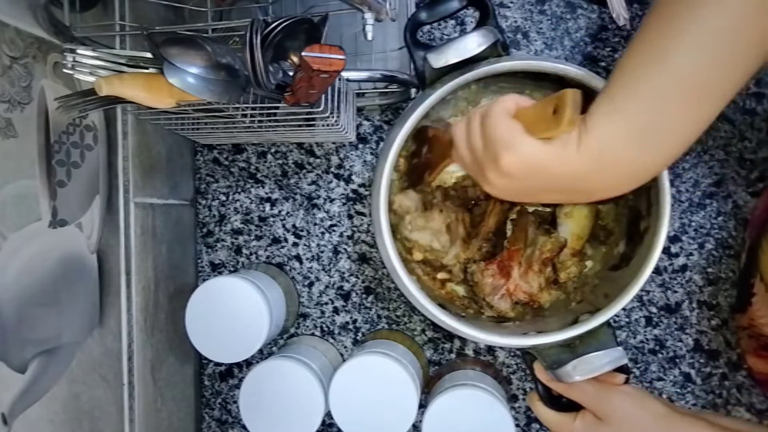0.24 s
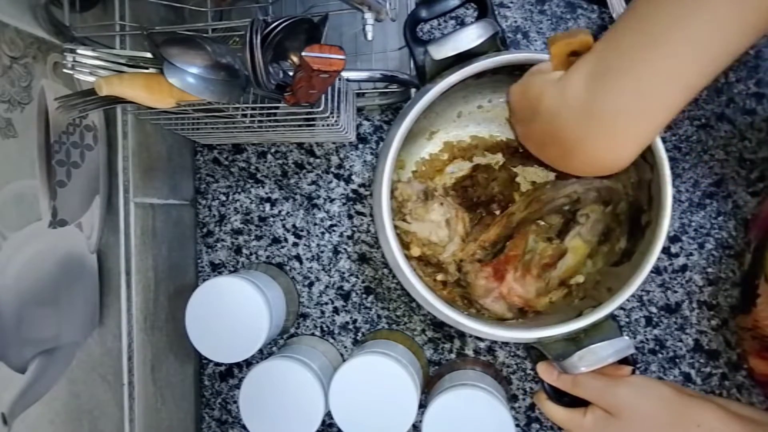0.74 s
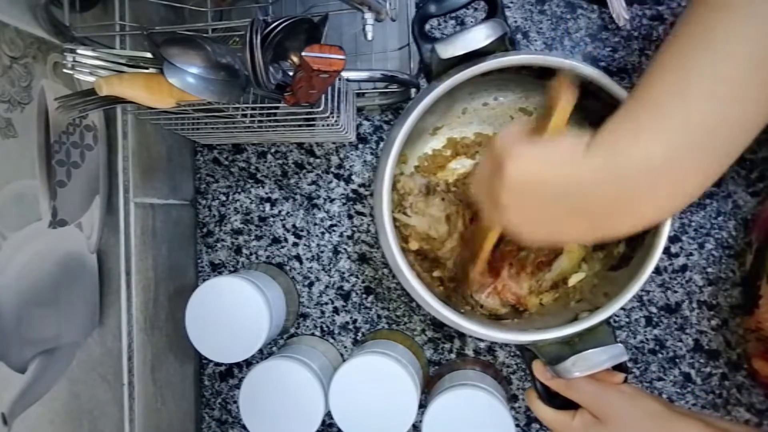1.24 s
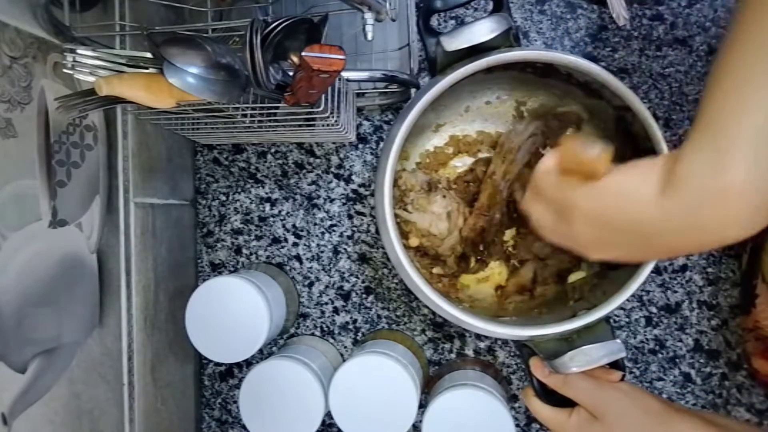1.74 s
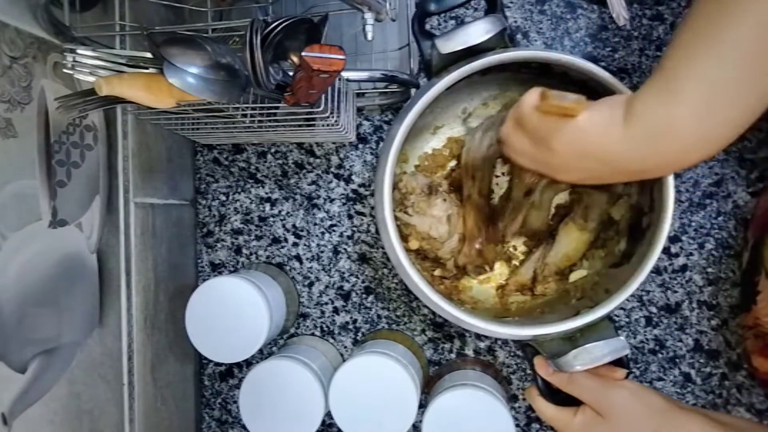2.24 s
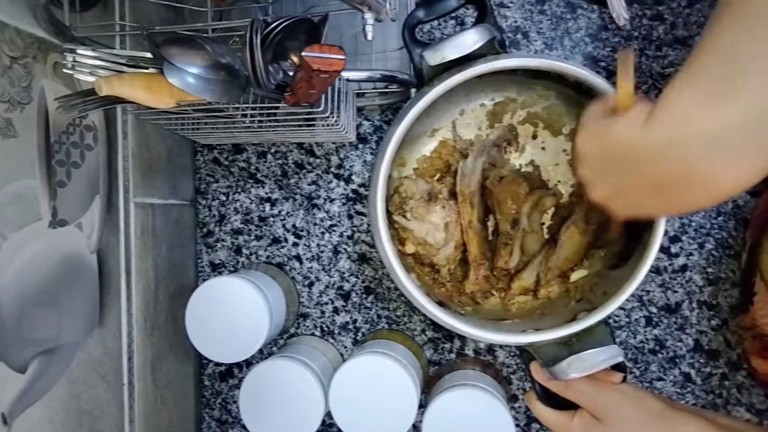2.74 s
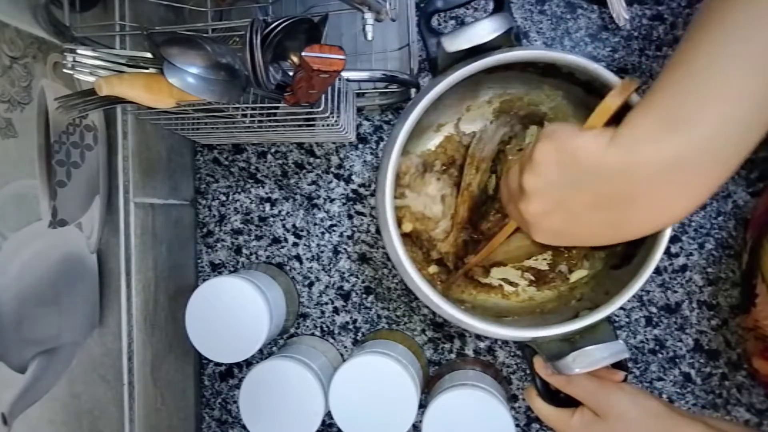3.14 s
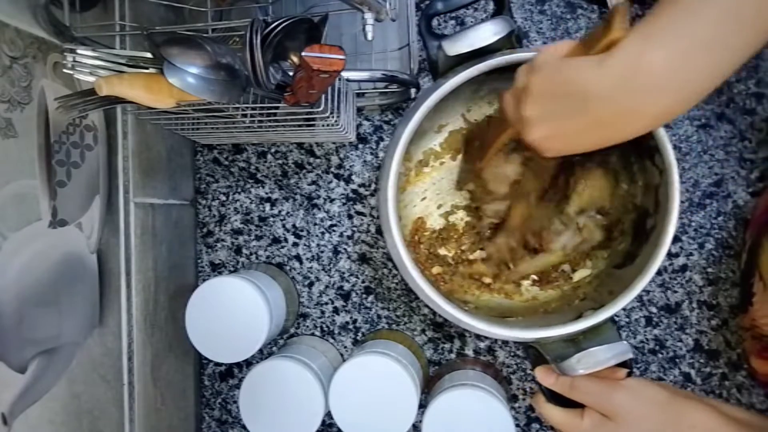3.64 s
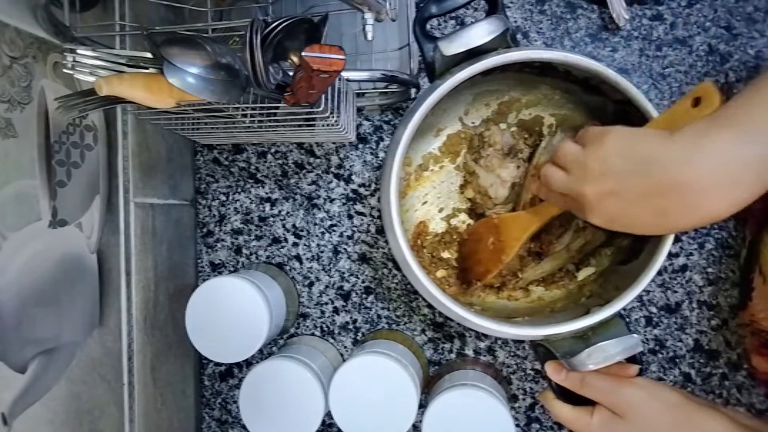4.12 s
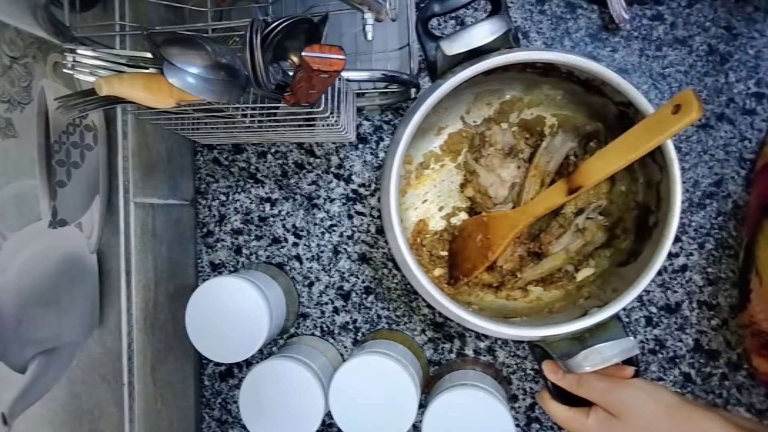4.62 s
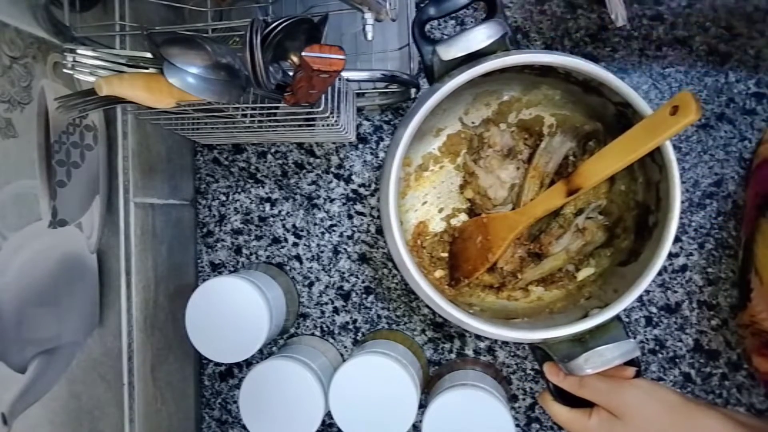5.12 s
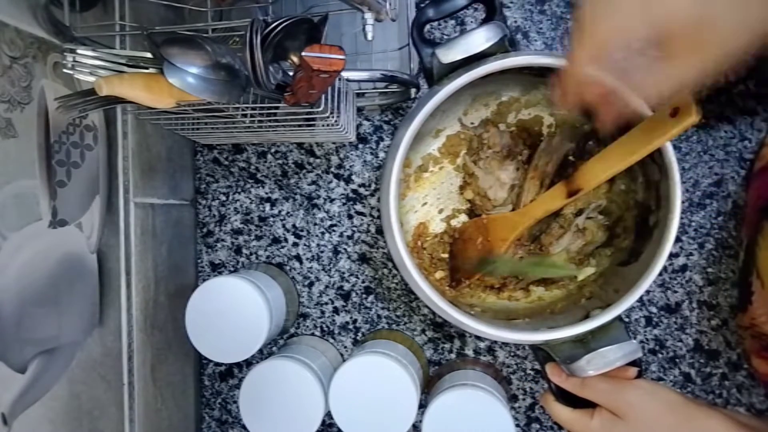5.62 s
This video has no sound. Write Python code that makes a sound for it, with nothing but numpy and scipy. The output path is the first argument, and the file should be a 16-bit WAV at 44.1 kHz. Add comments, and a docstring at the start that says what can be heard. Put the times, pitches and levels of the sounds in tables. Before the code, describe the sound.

A wooden spoon scrapes and knocks around a steel pot of food, then cutlery jangles in a rack in a small kitchen.

```python
"""A wooden spoon scrapes and knocks around a steel pot on a stone counter in a small, hard kitchen.
Its slips hiss and ring the food-damped base; its knocks ring the base or the free rim. A dish is tapped
and cutlery jangles in a rack. In the background a fridge hums and something squeaks faintly.
One microphone hears it all, the direct sound with a short room echo behind it."""
import sys
import numpy as np
from scipy import signal
from scipy.fft import rfft, irfft, next_fast_len
from scipy.io import wavfile
from scipy.ndimage import uniform_filter1d

SR = 44100
rng = np.random.default_rng(int(sys.argv[2]) if len(sys.argv) > 2 else 0)


def int16_out(signal):
    """Quantize to a 16-bit WAV file."""
    q = np.round(np.clip(np.atleast_2d(signal).T, -1, 1) * 32767)
    wavfile.write(sys.argv[1], SR, q.astype(np.int16))


N = 258867

# The air of the room. Each row: frequency in Hz, relative level in dB.
AIR_SPECTRUM = [(13, -31), (22, -14), (43, -6), (61, -0.5), (78, -16.5), (150, -12.5), (250, -7),
                (400, -18), (860, -23.5), (1670, -20.5), (2450, -31), (3600, -29), (5800, -30),
                (16000, -25)]
# The fridge motor, in the background. Each row: frequency in Hz, level in dB, width in Hz.
FRIDGE_LINES = [(46, -63, 0.62), (94.7, -72, 3.5), (193.6, -72.5, 2.4), (244.4, -73.5, 2.3),
                (283, -70, 2.6), (1616, -74, 3.7), (1702, -72.5, 2.8), (1804, -74, 10), (3577, -76.5, 55),
                (9730, -79.5, 34), (12500, -81, 130), (14660, -77, 150)]
# The echo off the hard walls. Each row: frequency in Hz, t60 in seconds.
KITCHEN_DECAY = [(200, 0.42), (530, 0.46), (1390, 0.58), (3680, 0.49), (9700, 0.37)]
# Faint squeaks. Each row: start and length in seconds, first and last pitch in Hz, level in dB,
# width in Hz.
FAINT_SQUEAKS = [(2.708, 0.148, 4380, 4260, -70, 300), (3.346, 0.18, 4440, 4360, -68.5, 90)]
# Jolts of the cutlery rack. Each row: time of strongest rattle in seconds, level in dB,
# swell and fade in seconds, share that rings the pieces in dB.
RACK_JOLTS = [(4.913, -43.5, 0.0047, 0.23, 0.5), (4.959, -33, 0.0086, 0.15, -1),
              (4.985, -32, 0.042, 0.08, 1), (5.026, -32, 0.055, 0.076, 1.5), (5.113, -39, 0.013, 0.077, -3),
              (5.17, -51, .15, .8, -17)]
# Ringing forks and spoons. Each row: frequency in Hz, nominal width in Hz, relative level in dB.
CUTLERY_MODES = [(1770, 37, -13), (2600, 40, -17.5), (3660, 50, -18.5), (5590, 21, -12), (7120, 87, -15),
                 (7910, 43, -20), (8380, 30, -10), (8560, 31, -8), (8830, 45, -15), (9130, 35, -8),
                 (10300, 51, -15), (11000, 41, -4), (11450, 45, -7.5), (12400, 33, -10), (13200, 33, -9),
                 (13700, 60, -9), (15500, 29, -6), (15800, 30, -7)]
# Their dry clatter. Each row: frequency in Hz, relative level in dB.
CLATTER_SPECTRUM = [(500, -16.5), (800, -12.5), (1500, -1), (2100, -1.5), (5300, -4), (9000, -1.5),
                    (12000, -4), (16000, -10.5)]
# Taps on the dish and the pot's rim. Each row: start in seconds, peak of the ring in dB,
# centre of the blow's spectrum in Hz, its spread in octaves.
DISH_BLOWS = [(1.451, -29.5, 1330, 1.164)]
RIM_BLOWS = [(2.922, -46.5, 2300, 1.06), (2.955, -51, 1960, 0.62), (2.99, -53, 2320, 1.1),
             (4.283, -22, 1550, 1.9)]
# Dull knocks on the pot's base, and one thud of the cutlery rack at 5.11 s. Each row: as for the taps.
DULL_KNOCKS = [(.185, -41, 412, 1.76), (.6, -52.5, 1200, 0.32), (.722, -41.5, 477, 1.7),
               (1.838, -41, 1400, 0.4), (2.17, -49.5, 1470, 0.5), (2.365, -47, 457, 1.2),
               (2.718, -43, 284, 0.37), (3.311, -32, 243, 1.42), (3.35, -46, 376, 0.28),
               (3.385, -62, 370, 0.42), (3.552, -48.5, 382, 0.52), (3.59, -49.5, 490, 1.04),
               (3.76, -49.5, 1120, 0.63), (3.819, -39.5, 298, 0.32), (3.876, -37.5, 289, 0.41),
               (3.965, -49, 1280, 0.38), (5.109, -44.5, 870, 0.6), (5.47, -51, 1050, 0.3),
               (5.72, -53, 1560, 0.62), (5.78, -46.5, 520, 1.6)]
# Modes of the dish, the pot's free rim and its food-laden base.
# Each row: frequency in Hz, relative level in dB, t60 in seconds when struck.
DISH_MODES = [(362.6, 4, 0.91), (447, 0, 0.13), (720, -11.5, 0.14), (953, -12, 0.29), (1130, -7.5, 0.22),
              (1196, -14, 0.23), (1730, -7, 0.23), (1752, 0.5, 0.28), (1806, 1, 0.21), (1920, -19, 0.17),
              (2580, -26, 0.18), (2998, -6.5, 0.14), (3530, -8, 0.13)]
RIM_MODES = [(355, -12.5, 0.39), (389, -0.5, 0.29), (728, -11, 0.32), (943, -7.5, 0.36), (1090, -18.5, 0.4),
             (1178, -11.5, 0.4), (1334, 0, 0.055), (1490, -19, 0.12), (1786, -10.5, 0.4), (1786, -1, 0.38),
             (1819, -9.5, 0.37), (1930, -0.5, 0.11), (2236, -9.5, 0.18), (2740, -17, 0.29),
             (2970, -6, 0.18), (3080, -12, 0.22), (3440, -7, 0.15), (3553, -10, 0.16), (3850, -15, 0.17),
             (4160, -16, 0.13), (5220, -7, 0.22), (5453, -15, 0.15)]
BASE_MODES = [(175, -13, .05), (244, 1, 0.081), (299, -3, 0.07), (391.3, -1.5, 0.16), (707.5, -13, 0.076),
              (936.3, -9.5, 0.19), (1195, -9.5, 0.13), (1289.5, -6, 0.17), (1405, -13.5, 0.14),
              (1584, -6, 0.11), (1775, -11, 0.066), (1940, -12, 0.16), (2150, -14.5, 0.4),
              (2927, -16, 0.26), (3570, -17.5, 0.26)]
# Dry, bright ticks. Each row: start in seconds, level in dB, centre in Hz, spread in octaves,
# t60 in seconds.
DRY_TICKS = [(0.487, -35.5, 9000, 0.73, 0.12), (0.529, -50, 6000, 0.57, 0.051),
             (0.589, -40, 9400, 0.3, 0.053), (0.7184, -17.5, 7260, 0.38, 0.015),
             (1.453, -42, 8100, 0.63, 0.055), (1.76, -31.5, 10900, 0.21, 0.022),
             (1.8, -38, 10400, 0.62, .03), (1.837, -38.5, 4740, 1.2, 0.039), (2.145, -52, 5530, 0.63, .03),
             (2.919, -44.5, 9000, 0.69, .05), (3.552, -38, 8900, .5, .04), (3.599, -31, 11900, 0.5, 0.034),
             (3.967, -42, 6900, 0.92, 0.034), (4.28, -17.5, 8440, 0.41, 0.039),
             (4.91, -31, 9100, 0.24, 0.028), (4.956, -36, 8000, 1, .03), (5.465, -40, 12820, 0.42, 0.025),
             (5.779, -44, 6840, 0.83, 0.03)]
# Wood rubbing on steel. Each row: frequency in Hz, relative level in dB.
RUB_SPECTRUM = [(200, -17), (400, -16), (900, -16.5), (1800, -10.5), (2600, -16.5), (5500, -15.5),
                (9000, -10.5), (12000, -15), (16000, -15.5)]
# Strokes of the spoon. Each row: time of hardest push in seconds, rub level in dB,
# swell and fade in seconds, share that rings the pot in dB.
SPOON_STROKES = [(.035, -50.5, 0.081, 0.22, -15), (.19, -43, .13, .1, -15), (.57, -54.5, 0.13, 0.27, -16.5),
                 (.715, -49.5, 0.26, 0.22, -4.5), (.89, -53.5, 0.19, 0.26, -5.5),
                 (1.164, -62, 0.052, 0.23, -8), (1.29, -59, 0.072, 0.17, -19), (1.51, -61, 0.085, .2, 4.5),
                 (1.636, -59.5, 0.037, .08, -11), (1.87, -61, 0.14, .1, -3), (2.16, -62, 0.14, 0.19, -10),
                 (2.335, -57.5, 0.11, 0.18, -8), (2.52, -57.5, 0.3, 0.4, -8.5),
                 (2.935, -53, 0.043, 0.28, -9.5), (3.03, -48.5, 0.18, 0.37, -21),
                 (3.3, -59, 0.23, 0.75, -9.5), (3.56, -53, 0.025, 0.14, -8.5),
                 (3.8, -54.5, 0.2, 0.19, -11.5), (3.965, -56, .08, 0.38, -12),
                 (4.08, -63.5, .08, 0.28, -18), (5.55, -72.5, 0.15, 0.087, 1.5),
                 (5.73, -59, 0.024, 0.47, 2)]
# The microphone in its case. Each row: frequency in Hz, gain in dB.
MIC_RESPONSE = [(20, 1.5), (420, 1.5), (520, -9.5), (640, -7), (800, 0.5), (6500, 0), (8200, 4.5),
                (9100, 9), (10300, 2), (12000, -2), (16000, -1.5)]


def amp(db):
    """Gain of a level in dB."""
    return 10 ** (np.asarray(db) / 20)


def unit_rms(x):
    """Scales to rms 1."""
    return x / np.sqrt(np.mean(x ** 2) + 1e-20)


def curve_at(points, hz):
    """Reads a table on a log-frequency axis."""
    table_hz, value = np.transpose(points)
    return np.interp(np.log(hz + 1), np.log(table_hz + 1), value)


def coloured(x, spectrum):
    """Filters x by a table of levels, rms 1."""
    hz = np.fft.rfftfreq(len(x), 1 / SR)
    return unit_rms(irfft(rfft(x) * amp(curve_at(spectrum, hz)), len(x)))


def add(mix, start_s, sound):
    """Mixes a sound in at start_s."""
    part = mix[round(start_s * SR):][:len(sound)]
    part += sound[:len(part)]


def bell_db(hz, centre_hz, octaves):
    """A bell-shaped spectrum, 6 dB down at the given octaves from its centre."""
    return -6 * (np.log2((hz + 1) / centre_hz) / octaves) ** 2


def grit(per_s, spread_db):
    """Random slips of uneven size."""
    size = amp(spread_db * np.minimum(rng.exponential(1, N), 4)) * rng.standard_normal(N)
    return size * (rng.random(N) < per_s / SR)


def ring(hz, t60, seconds):
    """One dying mode."""
    t = np.arange(round(seconds * SR)) / SR
    return amp(-60 * t / t60) * np.sin(2 * np.pi * hz * t)


def burst(centre_hz, octaves, t60):
    """A short dying burst of noise with a bell spectrum."""
    t = np.arange(4096) / SR
    shape = amp(bell_db(np.fft.rfftfreq(4096, 1 / SR), centre_hz, octaves))
    noise = unit_rms(irfft(rfft(rng.standard_normal(4096)) * shape))
    attack = np.minimum(t / 0.0047, 1)
    return noise * attack * amp(-60 * t / t60) / 2


def wavering_tone(hz, width_hz, steady):
    """Slow noise plus a steady part, carried on the pitch curve hz, rms 1."""
    pole = np.exp(-np.pi * width_hz / SR)
    slow = rng.standard_normal(len(hz)) + 1j * rng.standard_normal(len(hz))
    for _ in range(2):
        slow = signal.lfilter([1 - pole], [1, -pole], slow)
    carrier = np.exp(2j * np.pi * np.cumsum(hz) / SR)
    return unit_rms(((slow / abs(slow).mean() + steady) * carrier).real)


def patchy(x, depth_db):
    """Lifts and lowers random patches of time and frequency, as the contact wanders; rms 1."""
    spectra = signal.stft(x, nperseg=256)[2]
    patches = uniform_filter1d(rng.standard_normal(spectra.shape), size=6, axis=0)
    patches = unit_rms(uniform_filter1d(patches, size=14, axis=1))
    return unit_rms(signal.istft(spectra * amp(depth_db * patches), nperseg=256)[1][:len(x)])


def movements(t, rows):
    """Gain of movements that swell and fade, and the part of it that reaches the ringing metal."""
    power = ring_power = 0
    for peak_s, db, swell_s, fade_s, share_db in rows:
        from_peak = np.maximum((peak_s - t) / swell_s, (t - peak_s) / fade_s)
        gain = amp(db - 20 * from_peak)  # 20 dB in one swell or fade time
        power += gain ** 2
        ring_power += (gain * amp(share_db)) ** 2
    return np.sqrt(power), np.sqrt(ring_power)


def room_tone(air_db=-57.5):
    """The bed under everything: steady air noise and the wavering lines of the fridge motor."""
    fridge = sum(amp(db) * wavering_tone(np.full(N, hz), width_hz, steady=60 / (width_hz + 8))
                 for hz, db, width_hz in FRIDGE_LINES)
    return amp(air_db) * coloured(rng.standard_normal(N), AIR_SPECTRUM) + fridge


def kitchen_echo(x):
    """The walls answer with sparse echoes of random sign, each band dying at its own speed."""
    echoes = np.zeros(SR)
    slots = np.arange(160, SR - 20, 20)
    echoes[slots + rng.integers(0, 20, len(slots))] = rng.choice([-1., 1.], len(slots))
    hz, t, spectra = signal.stft(echoes, SR, nperseg=256)
    decay = amp(-60 * t / curve_at(KITCHEN_DECAY, hz)[:, None])
    tail = signal.istft(spectra * decay, SR, nperseg=256)[1]
    return signal.fftconvolve(x, tail / np.linalg.norm(tail))[:N]


def squeaks():
    """Two faint, rough squeaks, each sinking a little in pitch."""
    out = np.zeros(N)
    for start_s, length_s, first_hz, last_hz, db, width_hz in FAINT_SQUEAKS:
        hz = np.linspace(first_hz, last_hz, round(length_s * SR))
        tone = wavering_tone(hz, width_hz, steady=0.2)
        add(out, start_s, amp(db) * tone * signal.windows.tukey(len(hz), .3))
    return out


def cutlery(ring_gain_db=-39.5, clatter_gain_db=-3):
    """Forks and spoons knock together in the rack; every piece rings on its own train of clicks."""
    start_s, length = RACK_JOLTS[0][0] - .05, round(.9 * SR)
    shake, ringing = movements(start_s + np.arange(length) / SR, RACK_JOLTS)
    rings = np.zeros(length)
    for hz, width_hz, db in CUTLERY_MODES:
        clicks = unit_rms(grit(per_s=150, spread_db=2.8)[:length]) * ringing
        mode = ring(hz, t60=1.3 / width_hz, seconds=.2)
        rings += amp(db) * np.sqrt(width_hz) * signal.oaconvolve(clicks, mode)[:length]
    slips = grit(per_s=9000, spread_db=1.3)[:length]
    clatter = shake * patchy(coloured(slips, CLATTER_SPECTRUM), depth_db=2.14)
    out = np.zeros(N)
    add(out, start_s, amp(ring_gain_db) * rings + amp(clatter_gain_db) * clatter)
    return out


def knocks(blows, modes, crack_db, rise_s):
    """Each blow rings the modes that lie in its spectrum, after a soft push, and adds a crack."""
    out = np.zeros(N)
    for start_s, db, centre_hz, octaves in blows:
        body = sum(amp(mode_db + bell_db(hz, centre_hz, octaves)) * ring(hz, t60, seconds=1.0)
                   for hz, mode_db, t60 in modes)
        body *= 1 - np.exp(-np.arange(len(body)) / SR / rise_s)
        add(out, start_s, amp(db) * body / abs(body).max())
        add(out, start_s, amp(db + crack_db) * burst(centre_hz, octaves, t60=0.12))
    return out


def ticks():
    """Short bright clicks of the spoon and of cutlery knocking in the rack."""
    out = np.zeros(N)
    for start_s, db, centre_hz, octaves, t60 in DRY_TICKS:
        add(out, start_s, amp(db) * burst(centre_hz, octaves, t60))
    return out


def spoon_scrape():
    """Dense slips of wood on steel hiss in the air and keep the damped modes of the pot ringing."""
    rub, ringing = movements(np.arange(N) / SR, SPOON_STROKES)
    slips = grit(per_s=12000, spread_db=0.92)
    hiss = patchy(coloured(slips, RUB_SPECTRUM), depth_db=3.04)
    pot = sum(amp(db) * ring(hz, 1.1 * t60, seconds=.3) for hz, db, t60 in BASE_MODES)
    return rub * hiss + ringing * unit_rms(signal.oaconvolve(slips, pot)[:N])


def scene():
    """The kitchen from one microphone position, alike in both channels."""
    thuds = knocks(DULL_KNOCKS, BASE_MODES, crack_db=0.34, rise_s=0.0022)
    rim = knocks(RIM_BLOWS, RIM_MODES, crack_db=0.31, rise_s=0.0024)
    dish = knocks(DISH_BLOWS, DISH_MODES, crack_db=-6.5, rise_s=0.00091)
    hits = thuds + rim + dish + ticks()
    near = spoon_scrape() + cutlery()  # less echo, so these sound closer
    echo = amp(-1) * kitchen_echo(hits) + amp(-5) * kitchen_echo(near)
    mono = hits + near + echo + squeaks() + room_tone()
    return np.array([mono, mono])


def record(dry):
    """The colour of the microphone in its case, then the band limit of the recorder."""
    size = next_fast_len(N + 4096)
    response = amp(curve_at(MIC_RESPONSE, np.fft.rfftfreq(size, 1 / SR)))
    heard = irfft(rfft(dry, size) * response, size)[:, :N]
    lowpass = signal.firwin(1023, cutoff=15830, window=("kaiser", 9), fs=SR)
    return signal.oaconvolve(heard, lowpass[None], "same")


dry = scene()
out = record(dry)
int16_out(out)
```